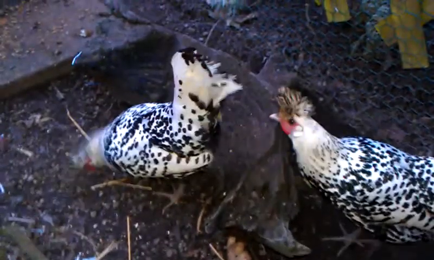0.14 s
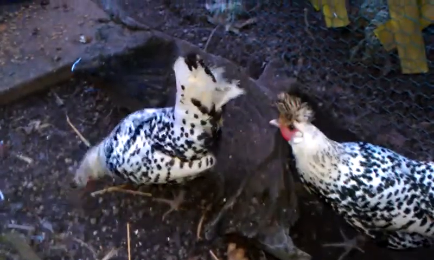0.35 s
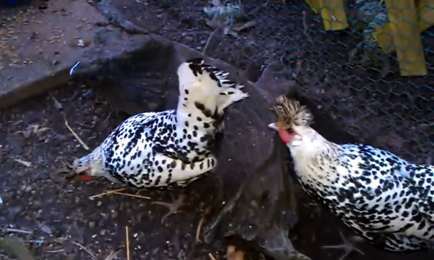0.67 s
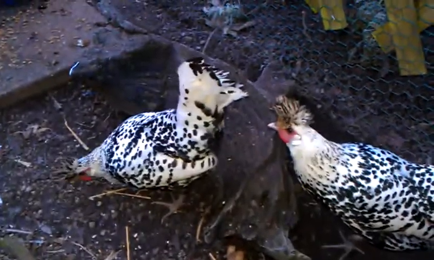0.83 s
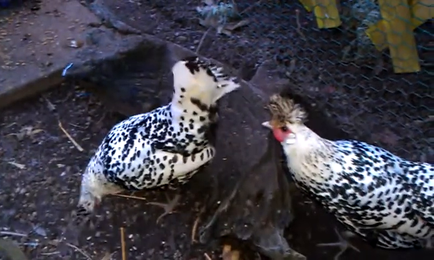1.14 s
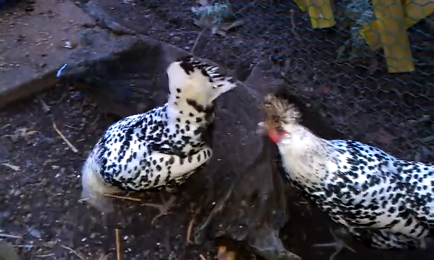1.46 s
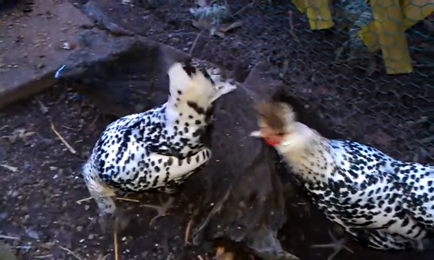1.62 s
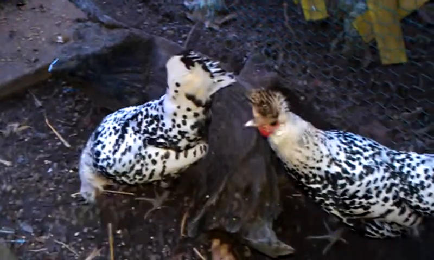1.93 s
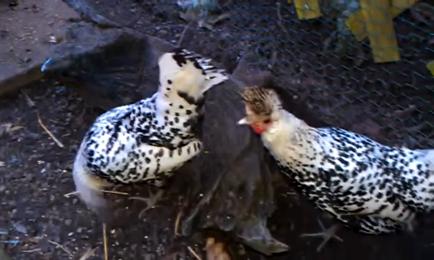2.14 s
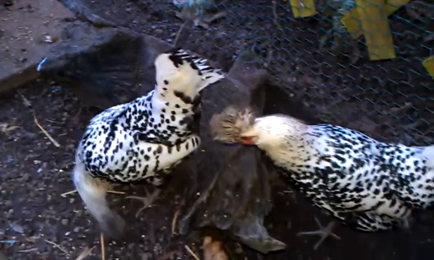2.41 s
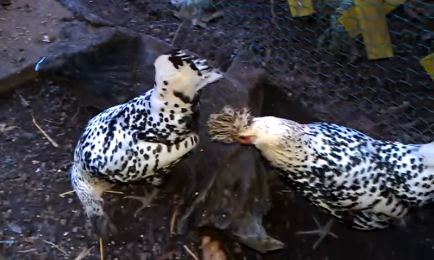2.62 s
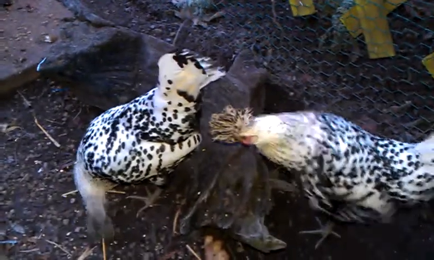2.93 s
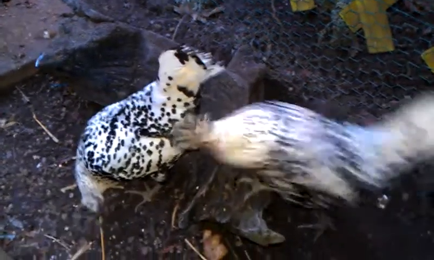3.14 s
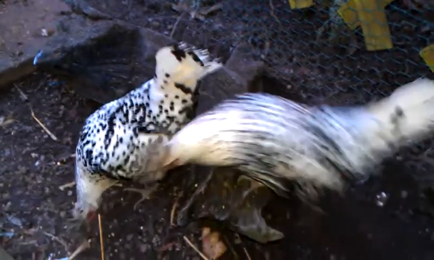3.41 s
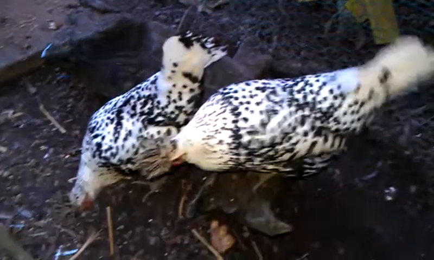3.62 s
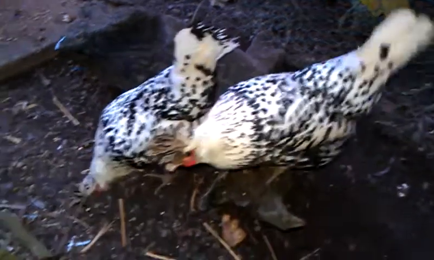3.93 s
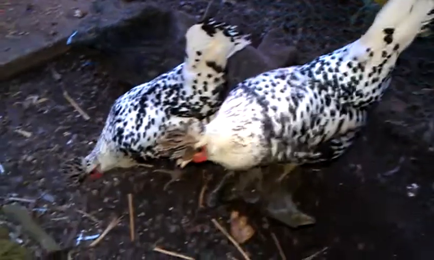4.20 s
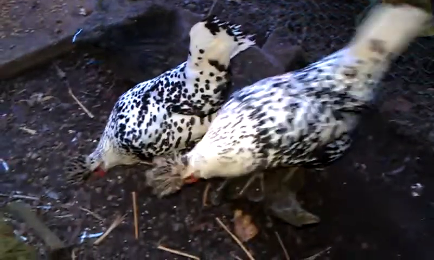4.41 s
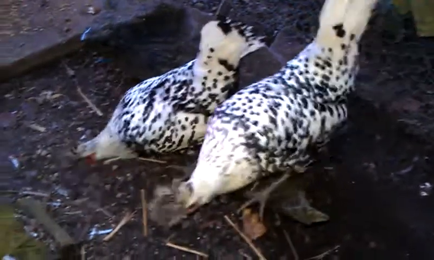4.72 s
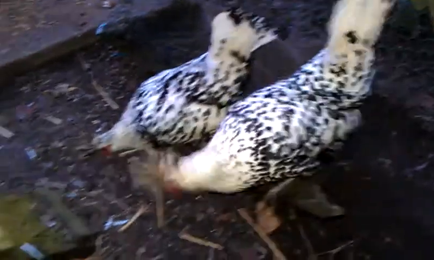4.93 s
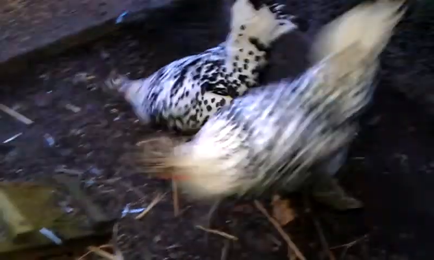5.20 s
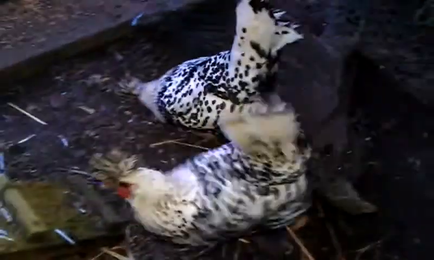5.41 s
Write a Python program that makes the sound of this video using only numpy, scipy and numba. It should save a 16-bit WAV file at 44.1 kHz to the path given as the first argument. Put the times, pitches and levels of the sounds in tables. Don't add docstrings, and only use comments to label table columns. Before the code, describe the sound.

Outdoor hen run with faint garden hiss. Small dry ticks of beaks and claws, faint distant clucks, and an echoing songbird repeating sliding whistles with a short buzz. Then a hen near the microphone starts a thin, catching whine that climbs and roughens into a squawk, followed by rapid harsh cackles. Litter scratching grows louder at the end as the birdsong returns.

```python
import sys
import numpy as np
from scipy import signal
from scipy.fft import rfft, irfft, next_fast_len
from scipy.io import wavfile
from scipy.ndimage import uniform_filter1d
from numba import njit

SR = 44100
rng = np.random.default_rng(int(sys.argv[2]) if len(sys.argv) > 2 else 0)


def transcribe(signal):
    frames = np.atleast_2d(signal).T
    limited = np.clip(frames, -1, 1)
    pcm = np.round(limited * 32767).astype(np.int16)
    wavfile.write(sys.argv[1], SR, pcm)


def convert_level_to_amplitude(level_db):
    exponent = np.asarray(level_db, float) / 20
    return 10 ** exponent


N = 245195
T = np.arange(N) / SR

# (frequency [Hz], density [dB per Hz])
GARDEN_SPECTRUM = [(20, -7.5), (50, -3), (90, -4.5), (200, -5), (700, -6), (1300, -9), (2500, -15),
                   (4500, -15), (6500, -13.5), (7900, -8.5), (9300, -17), (10400, -10), (11300, -17),
                   (16000, -19.5)]
# (time [s], length [s], frequency [Hz], level [dB])
FAR_CALLS = [
    (0.927, 0.049, 630, -67),
    (1.22, 0.11, 1030, -64.5),
    (2.7, 0.16, 910, -64.5),
    (2.855, 0.074, 600, -66.5),
    (5.373, 0.096, 1000, -58),
    (2.66, 0.29, 7950, -67.5),
]
# (time [s], half length [s], level [dB])
RUSTLES = [
    (.42, 0.29, -64),
    (.85, 0.09, -75),
    (4.71, 0.2, -49),
    (5.079, 0.13, -60),
    (5.22, .06, -54),
    (5.346, 0.098, -47.5),
    (5.428, 0.096, -52),
]
# (centre [Hz], width [Hz], level [dB])
LITTER_MODES = [(2910, 3200, -6), (5000, 7400, -5), (8650, 1300, 6), (12000, 4300, -17)]
# (time [s], peak level [dB], centre [Hz],
# decay [s])
TICKS = [(.074, -43.5, 7500, 0.021), (0.522, -44.5, 7900, 0.096), (1.314, -55, 7900, 0.055),
         (1.708, -56, 7430, .04), (1.827, -45, 7450, 0.021), (2.427, -38, 7300, 0.056),
         (2.798, -46, 7700, 0.079), (2.818, -48, 7800, 0.042), (3.011, -41, 7260, 0.069),
         (3.1, -48.5, 7600, 0.018), (3.138, -43, 1080, 0.07), (5.507, -36.5, 7200, 0.048),
         (3.282, -50.5, 7500, 0.064), (3.451, -42.5, 8100, 0.067), (3.76, -46.5, 8400, 0.044),
         (4.083, -31, 7000, 0.045), (4.151, -51, 7660, 0.039), (4.274, -27, 7245, 0.024),
         (4.393, -30.5, 1360, 0.15), (4.643, -36, 1368, 0.048), (4.472, -55, 7400, 0.047),
         (4.636, -40, 7170, 0.099), (4.802, -34, 1464, 0.068), (4.951, -31.5, 1423, 0.033),
         (5.102, -38.5, 1904, 0.032), (5.325, -24.5, 8000, 0.034), (5.367, -30, 7480, 0.042),
         (5.437, -29.5, 7030, 0.03)]

# (time after note start [s], frequency [Hz], level [dB])
HIGH_SLIDE = [(0, 5420, -7), (.007, 6320, -7), (.04, 7000, -1), (.058, 5660, -2), (.075, 5000, -2),
              (.1, 4580, -8), (.125, 4555, -38), (.15, 4610, -4)]
LOW_SLIDE = [(0, 5000, -10.5), (.014, 5000, -2), (.035, 3960, -5), (.055, 3395, -19.5), (.08, 3000, -25),
             (.11, 3213, -21)]
RISE = [(0, 3350, -13), (.018, 4210, -6), (.036, 4450, -12), (.06, 4460, -6), (.075, 4537, -1.5),
        (.085, 4670, -22), (.115, 4470, -13), (.13, 4540, -37)]
# (time [s], level [dB], time stretch [ratio])
HIGH_NOTES = [
    (1.318, -42.5, 1.0),
    (1.838, -38, 1.125),
    (2.392, -38.5, 1.0),
    (5.294, -38.5, 1.0),
]
LOW_NOTES = [
    (1.54, -42.5, 0.98),
    (2.071, -41, 1.32),
    (2.639, -45, 1.1),
    (5.525, -35.5, 1.3),
]
RISE_NOTES = [
    (1.686, -41.5, 0.94),
    (2.236, -42.5, 0.92),
    (2.78, -42.5, 0.75),
]
# (time [s], level [dB])
BUZZ_NOTES = [
    (1.516, -52),
    (2.046, -52),
    (2.606, -52),
    (5.498, -56),
]
PHRASE_PITCH = [1.0, .99, .985, .985]

# (centre [Hz], width [Hz], level [dB])
THROAT_MODES = [(390, 29.4, -12.5), (625, 158, -7), (862, 154, -8), (1125, 142, -3), (1395, 166, 1)]
MOUTH_MODES = [(1804, 82, 9), (1902, 33, 11.5), (2284, 650, -1.5), (2617, 300, 6.5), (3240, 62, 2)]
BEAK_MODES = [(4270, 1000, -8.5), (5025, 80, -3.5), (5730, 1460, -10), (7260, 110, -10.5),
              (8400, 200, -5.5), (9349, 600, -16), (10600, 3300, -26)]
WHEEZE_MODES = [(1640, 130, -2), (2770, 350, -2)]
# (time [s], level [dB], membrane rate [Hz], effort [0-1])
WIND_UP = [
    (3.14, -52.5, 629.5, 0),
    (3.27, -48.5, 645, 0.15),
    (3.329, -48.5, 688, 0.2),
    (3.63, -47.5, 768.4, .33),
    (3.736, -45, 794, 0.46),
    (3.766, -43, 789, 0.7),
    (3.91, -41, 814.5, .8),
    (4.06, -37.5, 875, 0.93),
    (4.186, -37.5, 946, 1),
]
# (time [s], half length [s], depth [dB])
CATCHES = [
    (3.163, 0.013, 32),
    (3.189, 0.0096, 10),
    (3.224, 0.0088, 8),
    (3.274, .008, 20),
    (3.296, 0.0072, 17),
    (3.317, 0.0026, 19),
    (3.452, 0.0076, 4),
    (3.503, 0.0037, 11),
    (3.655, 0.013, 5.5),
    (3.745, 0.0083, 17),
]
# (effort [0-1], roughness [0-1], strong-weak share [0-1], clean fundamental level [dB])
MEMBRANE_LAW = [(0, .06, .02, -8), (.12, .1, .15, -6), (.3, .18, .2, -3), (.65, .33, .1, -8),
                (.9, .45, .1, -11), (1, .5, .1, -11)]
# (effort [0-1], mouth level [dB], beak level [dB], windpipe [Hz], lower beak [Hz])
AIRWAY_LAW = [(0, -19, -12, 1320, 4700), (.15, -42, -20, 1356, 4900), (.42, -41, -20, 1320, 5320),
              (.65, -18, -18, 1400, 5230), (1, -8.5, -3.5, 1533, 5100)]
# (time [s], held [s], level [dB], lower beak [Hz], upper beak [Hz])
CACKLES = [
    (4.404, .17, -35.5, 4700, 7670),
    (4.655, 0.074, -29, 4700, 7640),
    (4.815, 0.053, -30.5, 4748, 7984),
    (4.965, 0.063, -28.5, 4330, 7490),
    (5.112, 0.043, -28, 4582, 8150),
    (5.168, 0.025, -39, 4700, 8070),
]
# (time [s], held [s], level [dB], lower beak [Hz], upper beak [Hz])
CLUCKS = [
    (4.264, 0.061, -32.5, 4910, 7420),
    (5.275, 0.034, -26.5, 4890, 7900),
]


def level(x, db):
    return x * convert_level_to_amplitude(db) / np.sqrt(np.mean(x ** 2))


@njit
def svf(x, hz, width):
    y, b, l = np.empty(len(x)), 0., 0.
    for i in range(len(x)):
        g, k = np.tan(np.pi * hz[i] / SR), width / hz[i]
        v = (b + g * (x[i] - l)) / (1 + g * (g + k))
        b, l, y[i] = 2 * v - b, l + 2 * g * v, k * v
    return y


def resonate(x, modes, stretch):
    out = 0
    for k, (hz, width_hz, db) in enumerate(modes):
        centre_hz = hz * stretch * np.ones(N)
        once = svf(x, centre_hz, 1.5 * width_hz)
        out = out + (-1) ** k * convert_level_to_amplitude(db) * svf(once, centre_hz, 1.5 * width_hz)
    return out


def walk(rate_hz):
    k = int(SR / rate_hz)
    held = np.repeat(rng.standard_normal(N // k + 1), k)
    return 0.977 * uniform_filter1d(uniform_filter1d(held, k), k)[:N]


def even(x, span_s):
    return x / np.sqrt(uniform_filter1d(x ** 2, int(span_s * SR)) + 1e-18)


def echo(x, t60_s, wet_db, delay_s):
    t = np.arange(SR) / SR
    tail = rng.standard_normal(SR) * np.exp(-np.log(1000) * t / t60_s) * np.clip(t / delay_s, 0, 1)
    tail = tail / np.sqrt(np.sum(tail ** 2))
    return x + convert_level_to_amplitude(wet_db) * signal.fftconvolve(x, tail)[:N]


def garden():
    swell, size = walk(1.0), next_fast_len(N)
    hz, db = np.transpose(GARDEN_SPECTRUM)
    f = np.fft.rfftfreq(size, 1 / SR) + 1
    colour = rfft(rng.standard_normal(size)) * convert_level_to_amplitude(np.interp(np.log(f), np.log(hz), db))
    out = 0
    for octave in np.arange(4, 15):
        share = np.clip(1 - np.abs(np.log2(f) - octave), 0, 1)
        band = irfft(colour * share, size)[:N]
        out = out + band * convert_level_to_amplitude(.5 * swell + .8 * walk(8.3))
    return level(out, -60.5)


def far_calls():
    waver_s = np.cumsum(1 + 0.0055 * walk(65)) / SR
    flutter = convert_level_to_amplitude(7.0 * walk(70))
    out = 0
    for s, length_s, hz, db in FAR_CALLS:
        swell = np.sin(np.pi * np.clip((T - s) / length_s, 0, 1))
        out = out + convert_level_to_amplitude(db) * swell * np.sin(2 * np.pi * hz * waver_s)
    return flutter * out


def rustle():
    grains = rng.standard_normal(N) * convert_level_to_amplitude(2.7 * walk(450) + 2.0 * walk(24.36))
    edge_db = 26.5
    stir = sum(convert_level_to_amplitude(db - edge_db * ((T - s) / half_s) ** 2) for s, half_s, db in RUSTLES)
    return level(resonate(grains, LITTER_MODES, 0.89), 0.42) * stir


def ticks():
    out, t = np.zeros(N + SR), np.arange(SR // 8) / SR
    noise = rng.standard_normal((len(TICKS), len(t)))
    for (s, db, hz, decay_s), grit in zip(TICKS, noise):
        crack = grit * np.exp(-np.log(1000) * t / max(decay_s, .005)) * np.clip(t / 0.0013, 0, 1)
        centre_hz = hz + 0 * t
        narrow = svf(svf(crack, centre_hz, .45 * hz), centre_hz, .45 * hz)
        ring = narrow + .2 * svf(crack, centre_hz, 1.5 * hz)
        out[int(s * SR):][:len(t)] += convert_level_to_amplitude(db) * ring / np.abs(ring).max()
    return out[:N]


def whistle(shape, notes):
    s, hz, db = np.transpose(shape)
    out = 0
    for (start_s, note_db, stretch), pitch in zip(notes, PHRASE_PITCH):
        at_s = start_s + stretch * s
        f = pitch * np.interp(T, at_s, hz)
        gain = convert_level_to_amplitude(note_db + np.interp(T, at_s, db, -200, -200))
        out = out + gain * np.sin(2 * np.pi * np.cumsum(f) / SR)
    return out


def songbird():
    song = whistle(HIGH_SLIDE, HIGH_NOTES) + whistle(LOW_SLIDE, LOW_NOTES) + whistle(RISE, RISE_NOTES)
    hiss = level(resonate(rng.standard_normal(N), [(7000, 3300, 0), (8670, 2000, -1)], 0.93), 0)
    buzz = hiss * sum(convert_level_to_amplitude(db) * (T > s) * np.exp(-np.abs(T - s) / 0.032) for s, db in BUZZ_NOTES)
    direct = convert_level_to_amplitude(-0.5) * (song * convert_level_to_amplitude(4 * walk(160)) + buzz)
    return echo(direct, t60_s=.34, wet_db=3, delay_s=0.012) * convert_level_to_amplitude(1.4 * walk(90))


def law(table, effort):
    x, *columns = np.transpose(table)
    return [np.interp(effort, x, c) for c in columns]


@njit
def flap(hz, rough, half, chance):
    out, p, k = np.zeros(len(hz) + 1), 0., 0
    for i in range(len(hz)):
        step = hz[i] * np.exp(rough[i] * chance[0, k]) / SR
        p += step
        if p >= 1:
            p, k = p - 1, k + 1
            size = (1 + rough[i] * chance[1, k]) * (1 + half[i] * (2 * (k % 2) - 1))
            out[i] += size * p / step
            out[i + 1] += size * (1 - p / step)
    return out[:-1]


def membrane(hz, effort):
    rough, half, clean_db = law(MEMBRANE_LAW, effort)
    chance = rng.standard_normal((N // 20, 2)).T * np.array([[.5], [1.3]])
    throb = convert_level_to_amplitude(6.5 * np.clip(1 - 2.0 * rough, 0, 1) * walk(110) + 3.0 * rough * walk(300))
    pulses = flap(hz, rough, half, chance) * throb
    phase = 2 * np.pi * np.cumsum(hz * (1 + 0.1223 * rough * walk(170))) / SR
    return pulses, convert_level_to_amplitude(clean_db) * throb * np.sin(phase)


def note_gain(rows, rise_s, sag_db_per_s, release_s):
    out = 0
    for s, held_s, db, _, _ in rows:
        end_s = s + max(held_s, rise_s)
        times_s = [s, s + rise_s, end_s + 1e-4, end_s + release_s]
        levels_db = [-15.5, 0, -sag_db_per_s * held_s, -41]
        out = out + convert_level_to_amplitude(db + np.interp(T, times_s, levels_db, -200, -200))
    return out


def breath(linger):
    s, db, _, _ = np.transpose(WIND_UP)
    db = np.interp(T, [*s, s[-1] + linger * 0.04], [*db, db[-1] - 41], -200, -200)
    for at_s, half_s, depth_db in CATCHES:
        db = db - depth_db * np.clip(2 - 2 * np.abs(T - at_s) / half_s, 0, 1)
    cackle = note_gain(CACKLES, rise_s=0.0068, sag_db_per_s=6.5, release_s=linger * .045)
    cluck = note_gain(CLUCKS, rise_s=0.033, sag_db_per_s=60, release_s=linger * 0.054)
    return convert_level_to_amplitude(db), cackle, cluck


def hen():
    s, _, hz, effort = np.transpose(WIND_UP)
    starts_s, _, _, lowers_hz, uppers_hz = np.transpose(sorted([*CACKLES, *CLUCKS]))
    run = T >= starts_s[0]
    now = np.maximum(np.searchsorted(starts_s, T, "right") - 1, 0)
    since_s = np.maximum(T - starts_s[now], 0)
    hz = np.where(run, 852, np.interp(T, s, hz))
    effort = np.where(run, .87, np.interp(T, s, effort))
    pulses, clean = membrane(hz, effort)

    mouth_db, beak_db, pipe_hz, lower_hz = law(AIRWAY_LAW, effort)
    pipe_hz = np.where(run, 1530, pipe_hz)
    lower_hz = np.where(run, lowers_hz[now] - 1200 * since_s, lower_hz)
    upper_hz = np.where(run, uppers_hz[now] - 1700 * since_s, 8150)
    throat = even(resonate(pulses, [*THROAT_MODES, (pipe_hz, 230, 3)], 0.967), 0.053) + 2.0 * clean

    air = pulses + 6.0 * uniform_filter1d(np.abs(pulses), size=60) * rng.standard_normal(N)
    lower_mode = lower_hz * (1 + .025 * walk(25)), 260, np.where(run, 2, 1)
    upper_mode = upper_hz * (1 + .025 * walk(25)), 150, 2
    beak = resonate(air, [*BEAK_MODES, lower_mode, upper_mode], 0.97)
    mouth = resonate(air, MOUTH_MODES, 0.97)
    wheeze = resonate(air, WHEEZE_MODES, 0.95)

    long, cackle, cluck = breath(linger=1.3)
    treble = long + convert_level_to_amplitude(0.03) * cackle + convert_level_to_amplitude(-7) * cluck
    snap = convert_level_to_amplitude(8.5 * run * np.exp(-since_s / 0.041))
    inhale = np.sqrt(np.sin(np.pi * np.clip((T - 5.195) / 0.095, 0, 1)) + 1e-18)
    layers = [(throat, sum(breath(linger=1)) * snap ** 0.23),
              (mouth, treble * convert_level_to_amplitude(mouth_db)),
              (beak, treble * snap * convert_level_to_amplitude(beak_db) + convert_level_to_amplitude(-47.5) * inhale),
              (wheeze, convert_level_to_amplitude(-48.5) * inhale)]
    voice = sum(even(x, 0.024) * uniform_filter1d(gain, size=40) for x, gain in layers)
    return echo(voice, t60_s=.17, wet_db=-16, delay_s=0.0033)


def scene():
    mono = garden() + far_calls() + rustle() + ticks() + songbird() + hen()
    return np.array([mono, mono])


def band_limit(x):
    return signal.sosfilt(signal.butter(12, 15850, fs=SR, output="sos"), x)


def record(dry):
    return band_limit(dry)


dry = scene()
out = record(dry)
transcribe(out)
```